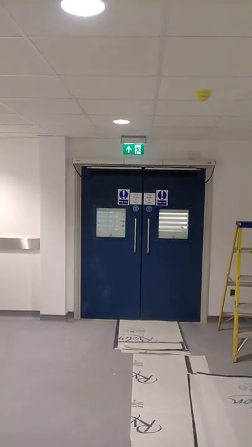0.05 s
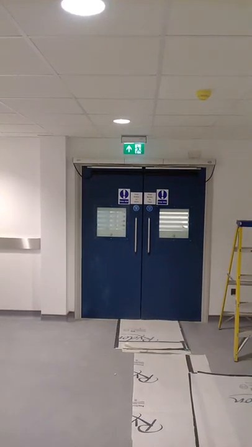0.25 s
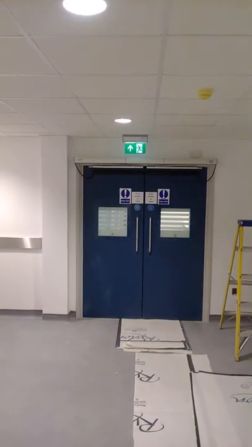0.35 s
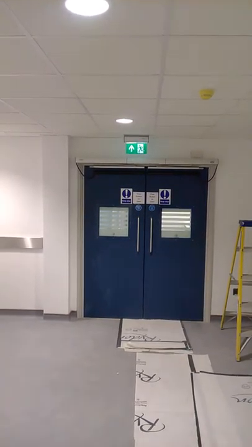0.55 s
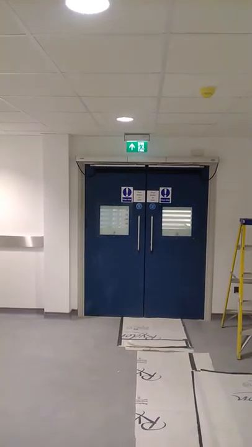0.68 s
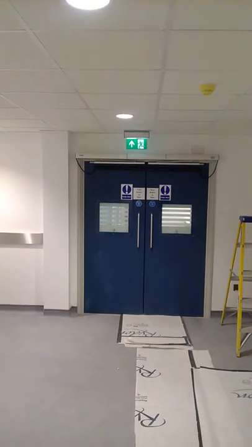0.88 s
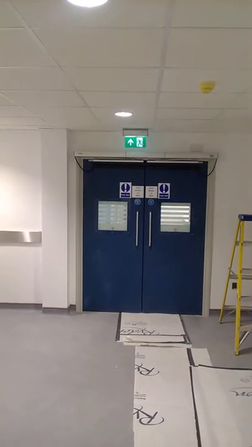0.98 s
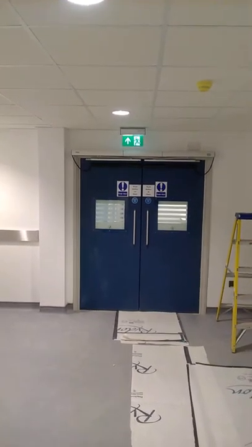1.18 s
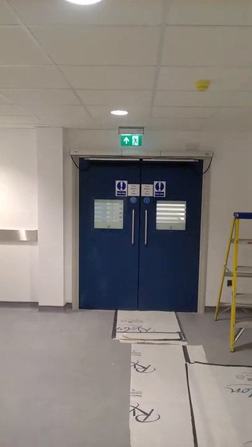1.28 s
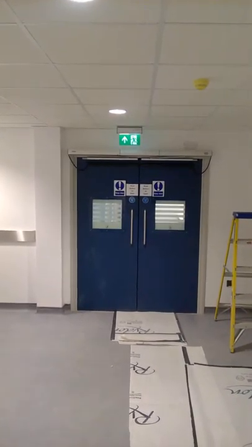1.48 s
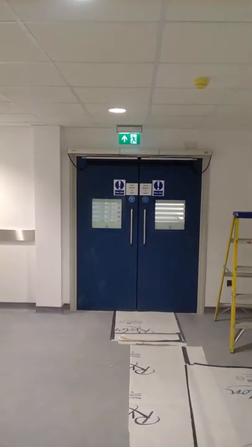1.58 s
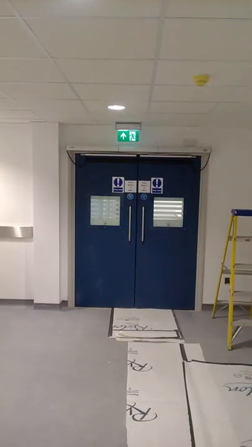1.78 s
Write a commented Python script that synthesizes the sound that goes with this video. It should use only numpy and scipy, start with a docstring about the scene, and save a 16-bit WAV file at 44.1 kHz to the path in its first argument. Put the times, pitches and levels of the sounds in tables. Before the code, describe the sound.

Double doors shut in a reverberant corridor. A faint hinge squeak fades, then one door clunks home and the other follows at once, the latch snapping in. The ringing dies away over quiet ventilation and electrical hum.

```python
"""Heavy double doors closing

At the end of a hard corridor a hinge squeak dies away and the latch ticks. The two leaves
clunk home one after the other: metal rings, the panels boom, the latch snaps in.
Ventilation and mains hum carry on underneath."""
import sys
import numpy as np
from scipy import signal
from scipy.fft import rfft, irfft
from scipy.io import wavfile

SR = 44100
rng = np.random.default_rng(int(sys.argv[2]) if len(sys.argv) > 2 else 0)


def int16_out(signal):
    """Quantize to a 16-bit WAV file."""
    q = np.round(np.clip(np.atleast_2d(signal).T, -1, 1) * 32767)
    wavfile.write(sys.argv[1], SR, q.astype(np.int16))


N = 81585
T = np.arange(N) / SR
HZ = np.maximum(np.fft.rfftfreq(N, 1 / SR), 1)

# Leaves meet the frame. Each row: start in seconds, leaf 0 or 1, knock, clatter and ring gains in dB.
LEAF_BLOWS = [(0.2118, 0, -25, -33.5, -38.5), (0.2190, 0, -18, -37.5, -48), (0.3825, 1, -21.5, -31, -34.5),
              (0.3872, 1, -28.5, -37, -52), (0.3973, 1, -27.5, -44, -55)]
# Short contact resonances, then longer rings of leaf and fittings.
# Each row: leaf, frequency in Hz, relative level in dB, T60 in seconds.
KNOCK_MODES = [(0, 1710, 7, 0.013), (0, 1980, -4, 0.0087), (0, 1380, -15, .012), (0, 6450, -10, 0.0081),
               (1, 1577, 1.5, 0.034), (1, 5050, -1.5, 0.02), (1, 1220, -15, 0.043), (1, 388, -12.5, 0.033),
               (1, 2630, -7, .015)]
RING_MODES = [(0, 764, -4.5, 0.49), (0, 1062, -3, .3), (0, 1447, -0.5, 0.27), (0, 1568, 5.5, 0.14),
              (0, 1629, -5, 0.33), (0, 1730, -14, 0.22), (0, 1794, -3, 0.56), (0, 2094, -6, 0.12),
              (1, 358, -4.5, 0.57), (1, 382, -9.5, 0.5), (1, 440, -16.5, 0.66), (1, 874, -7, 0.55),
              (1, 1030, -7.5, 0.48), (1, 1250, -8, 0.29), (1, 1478, -8.5, 0.41), (1, 1551, -6.5, 0.33),
              (1, 1663, 1.5, 0.4), (1, 1781, -13, 0.58), (1, 2681, -14, 0.47), (1, 5090, -17, .35),
              (1, 5184, -10, 0.48), (1, 5351, -14.5, 0.4)]
# Clatter of each leaf. Each row: frequency in Hz, relative density in dB.
FIRST_LEAF_SPECTRUM = [(25, -5), (60, -7), (110, -11.5), (170, -6), (335, -5.5), (480, -13), (560, -7),
                       (700, -7.5), (950, -12), (1150, -8), (1750, -7), (2100, -11), (3000, -20.5),
                       (4000, -24), (5200, -22), (7800, -24), (10000, -35.5), (14000, -49)]
SECOND_LEAF_SPECTRUM = [(25, -15), (60, -11), (110, -7.5), (170, -4.5), (260, -7), (350, -5), (600, -9),
                        (880, -9), (980, -9.5), (1300, -6), (1700, -6), (2300, -14), (3300, -17.5),
                        (4700, -22), (5250, -12), (5750, -22.5), (7600, -20), (9800, -35.5), (14000, -72)]


def leaves(contact_s=0.00085):
    """Each blow of a leaf on the frame gives a knock, a ring and a reverberant clatter."""
    attack = rise(contact_s)
    out = 0
    for start_s, leaf, knock_db, clatter_db, ring_db in LEAF_BLOWS:
        knock = from_db(knock_db) * ring(mode[1:] for mode in KNOCK_MODES if mode[0] == leaf)
        metal = from_db(ring_db) * ring(mode[1:] for mode in RING_MODES if mode[0] == leaf)
        body = from_db(clatter_db) * clatter((FIRST_LEAF_SPECTRUM, SECOND_LEAF_SPECTRUM)[leaf])
        out = out + delayed(attack * (knock + metal) + body, start_s)
    return out


# Corridor reverberation. Each row: frequency in Hz, T60 in seconds, build-up in seconds.
CORRIDOR_BANDS = [(40, 1, 0.016), (123, 0.92, 0.05), (344, 0.52, 0.0088), (900, 0.6, 0.0017),
                  (1690, 0.51, 0.00067), (3500, 0.54, 0.00067), (5950, 0.38, 0.00082), (8800, 0.42, 0.0039),
                  (14000, 0.2, .003)]
# Returns along the corridor. Each row: delay in seconds, gain in dB.
CORRIDOR_ECHOES = [(0.043, -12), (0.072, -11.5)]


def clatter(spectrum, echo_cutoff_hz=1600):
    """Dense response of leaf and corridor: octaves build and die at their own pace; dull echoes follow."""
    source = rfft(coloured(spectrum))
    out = 0
    for hz in np.geomspace(16, 16384, 11):
        octave = irfft(source * np.maximum(1 - abs(np.log2(HZ / hz)), 0), N)
        t60_s, build_s = at_hz(CORRIDOR_BANDS, hz), at_hz(CORRIDOR_BANDS, hz, column=2)
        out = out + octave * decay(t60_s) * rise(build_s)
    dull = signal.sosfilt(signal.butter(2, echo_cutoff_hz, fs=SR, output="sos"), out)
    return out + sum(from_db(db) * delayed(dull, delay_s) for delay_s, db in CORRIDOR_ECHOES)


# Panel flexes. Each row: start in seconds, gain in dB.
PANEL_FLEXES = [(0.232, -38.5), (0.314, -39), (0.442, -35), (0.559, -49.5)]
# Panel resonances. Each row: frequency in Hz, relative level in dB, T60 in seconds.
PANEL_MODES = [(33.4, -4.5, 0.73), (85.5, -1.5, 0.63), (98, -3.5, 0.37), (118.8, -5, .35),
               (154.6, -8, 0.45), (204.8, -13, 0.68), (293.2, -9, 0.45)]


def panels(rise_s=0.015):
    """Each heavy panel flexes as its leaf lands and rocks back once, swelling into a low boom."""
    boom = ring(PANEL_MODES) * rise(rise_s)
    return sum(from_db(db) * delayed(boom, start_s) for start_s, db in PANEL_FLEXES)


# Latch contacts. Each row: start in seconds, snap level in dB, tail level in dB.
LATCH_TICKS = [(0.0667, -59.5, -57.5), (0.1496, -72, -62), (0.189, -72, -60), (0.2134, -34, -56),
               (0.2165, -32, -57), (0.2415, -42.5, -75), (0.276, -43, -55), (0.327, -56, -58),
               (0.3883, -42, -57), (0.421, -34, -45), (0.4250, -29, -46), (0.4335, -37, -52)]
# Latch timbre. Each row: frequency in Hz, relative density in dB.
LATCH_SPECTRUM = [(1000, -6.5), (2500, -1.5), (4200, -7.5), (6000, -6.5), (7000, -2.5), (7800, 0),
                  (8600, -11), (10300, -18), (11500, -37), (15000, -48)]


def latch(attack_s=0.00098, snap_t60_s=0.022, tail_t60_s=0.24):
    """Each latch contact is a bright snap with a short tail in the corridor."""
    power = 0
    for start_s, snap_db, tail_db in LATCH_TICKS:
        envelope = from_db(snap_db) * decay(snap_t60_s) + from_db(tail_db) * decay(tail_t60_s)
        power = power + delayed(rise(attack_s) * envelope, start_s) ** 2
    bursts = np.sqrt(power) * rng.standard_normal(N)
    return shaped(bursts, rms_one(from_db(at_hz(LATCH_SPECTRUM, HZ))))


# Squeak partials. Each row: frequency in Hz, relative level in dB.
SQUEAK_PARTIALS = [(1618, -4.5), (1700, -1), (1732, -7.5)]


def hinge(gain_db=-54.5, fade_db_per_s=97, release_at_s=0.14, release_s=0.029):
    """A wavering hinge squeak fades as the door slows."""
    fade = from_db(gain_db - fade_db_per_s * T)
    release = np.exp(-np.maximum(T - release_at_s, 0) / release_s)
    squeak = sum(from_db(db) * tone(hz, wander_hz=18.8, rate_hz=77) for hz, db in SQUEAK_PARTIALS)
    return fade * release * squeak


# Door scuffs. Each row: start and length in seconds, centre and width in Hz, level in dB.
RUB_STROKES = [(0.152, 0.048, 2350, 900, -69), (0.189, 0.024, 1810, 1200, -53.5),
               (0.190, 0.019, 6100, 3500, -53), (0.194, 0.044, 10000, 500, -59.5),
               (1.755, 0.09, 1430, 453, -70)]


def rubs():
    """The doors rub briefly, each stroke a swell of band noise."""
    out = 0
    for start_s, length_s, centre_hz, width_hz, db in RUB_STROKES:
        progress = np.clip((T - start_s) / length_s, 0, 1)
        stroke = np.abs(np.sin(np.pi * progress)) ** 0.75
        friction = noise(1 / (1 + (2 * (HZ - centre_hz) / width_hz) ** 2))
        out = out + from_db(db) * stroke * friction
    return out


# Air noise. Each row: frequency in Hz, relative density in dB.
AIR_SPECTRUM = [(15, -36), (25, -11), (45, -14), (65, -11), (90, -7.5), (126, -6.5), (160, -9.5),
                (204, -11), (260, -14), (330, -15), (480, -18), (750, -19.5), (1200, -18), (1700, -20),
                (2300, -23.5), (4000, -24.5), (5200, -22.5), (6100, -24.5), (6950, -19.5), (7900, -35),
                (9500, -34.5), (13000, -31.5), (15500, -32.5)]
# Fan and mains overtones. Each row: frequency in Hz, level in dB.
HUM_PARTIALS = [(199.5, -79), (301, -76.5), (384, -82.5), (480, -83)]


def ventilation(air_db=-66, mains_db=-70, whine_db=-87):
    """Air noise, fan and mains hum, and a thin electrical whine."""
    overtones = sum(from_db(db) * tone(hz, wander_hz=1.55, rate_hz=4.85) for hz, db in HUM_PARTIALS)
    mains = from_db(mains_db) * tone(99.7, wander_hz=0.16, rate_hz=2)
    air = from_db(air_db) * coloured(AIR_SPECTRUM)
    whine = from_db(whine_db) * tone(15686, wander_hz=1.4, rate_hz=7.2)
    return air + overtones + mains + whine


def ring(modes):
    """Struck modes: decaying sines of alternating sign."""
    return sum((-1) ** k * from_db(db) * decay(t60_s) * np.sin(2 * np.pi * hz * T)
               for k, (hz, db, t60_s) in enumerate(modes))


def tone(hz, wander_hz, rate_hz):
    """Sine of rms 1 with wandering pitch."""
    pitch_hz = hz + wander_hz * noise(1 / (1 + (HZ / rate_hz) ** 2))
    return np.sqrt(2) * np.sin(2 * np.pi * (np.cumsum(pitch_hz) / SR + rng.random()))


def noise(gain):
    """Noise of rms 1, weighted per frequency."""
    return rms_one(irfft(rfft(rng.standard_normal(N)) * gain, N))


def coloured(spectrum, low_cut_hz=20):
    """Noise of rms 1 with a tabled spectrum, infrasound rolled off."""
    return noise(from_db(at_hz(spectrum, HZ)) / np.sqrt(1 + (low_cut_hz / HZ) ** 6))


def shaped(x, gain):
    """Minimum-phase filter with the given gain per frequency."""
    cepstrum = irfft(np.log(gain + 1e-9), N)
    causal = cepstrum * (1 + np.sign(np.fft.fftfreq(N)))
    return irfft(rfft(x) * np.exp(rfft(causal)), N)


def at_hz(table, hz, column=1):
    """Interpolate a column over log frequency."""
    rows = np.array(table)
    return np.interp(np.log(hz), np.log(rows[:, 0]), rows[:, column])


def rise(tau_s):
    """Exponential approach from 0 to 1."""
    return 1 - np.exp(-T / tau_s)


def decay(t60_s):
    """Falls 60 dB in t60_s."""
    return np.exp(-np.log(1000) * T / t60_s)


def delayed(x, start_s):
    """Start x at start_s."""
    return np.concatenate([np.zeros(int(start_s * SR)), x])[:N]


def from_db(db):
    """Decibels to gain."""
    return 10 ** (np.asarray(db) / 20)


def rms_one(x):
    """Scale to rms 1."""
    return x / np.sqrt(np.mean(x ** 2) + 1e-20)


def scene():
    """Doors over the ventilation, in mono."""
    return (leaves() + panels() + latch() + hinge() + rubs() + ventilation())[None]


def record(dry):
    """Steep low-pass on the top treble."""
    cutoff_hz = 15800
    return signal.sosfilt(signal.ellip(12, 0.1, 70, cutoff_hz, fs=SR, output="sos"), dry)


dry = scene()
out = record(dry)
int16_out(out)
```